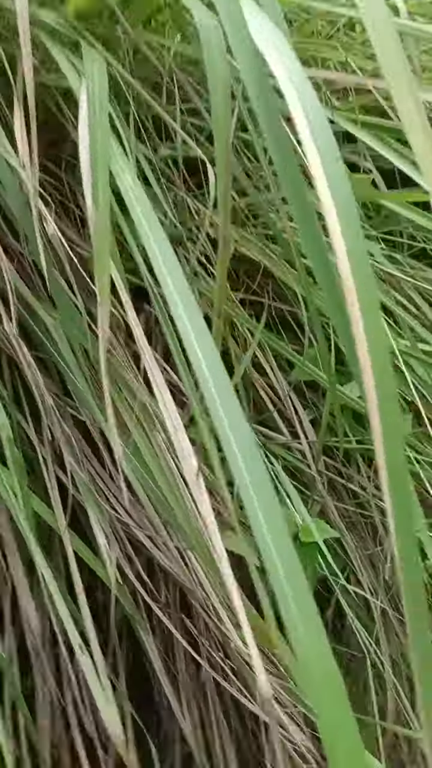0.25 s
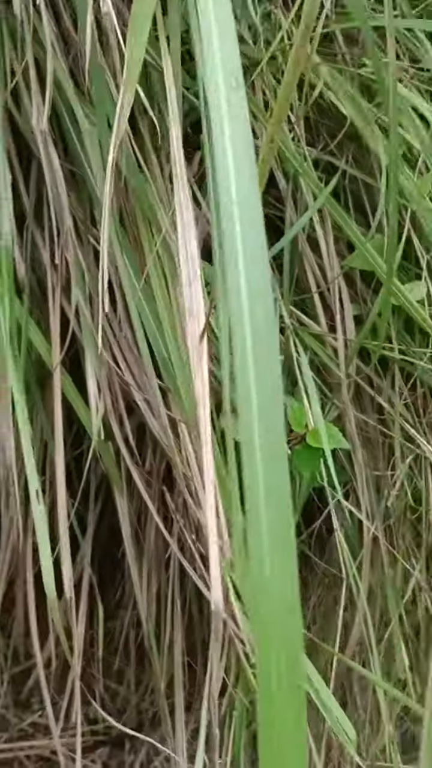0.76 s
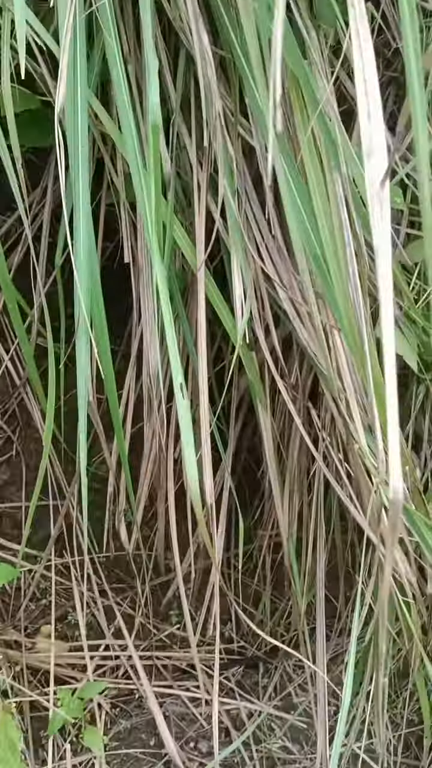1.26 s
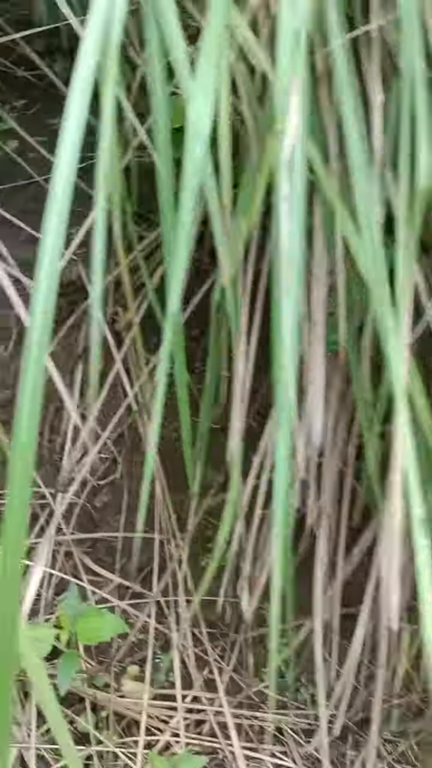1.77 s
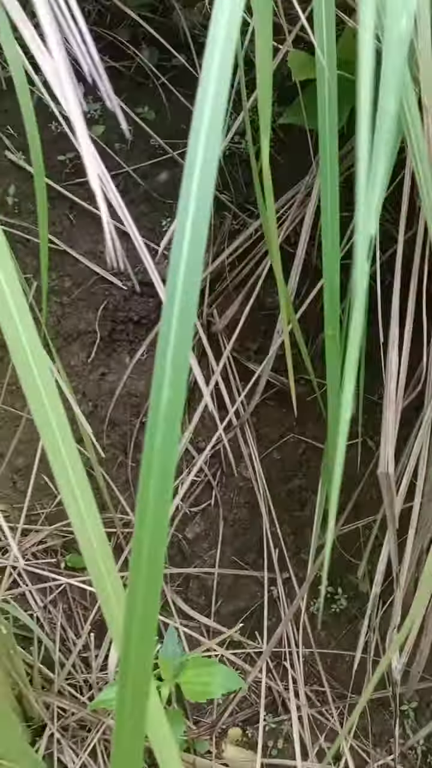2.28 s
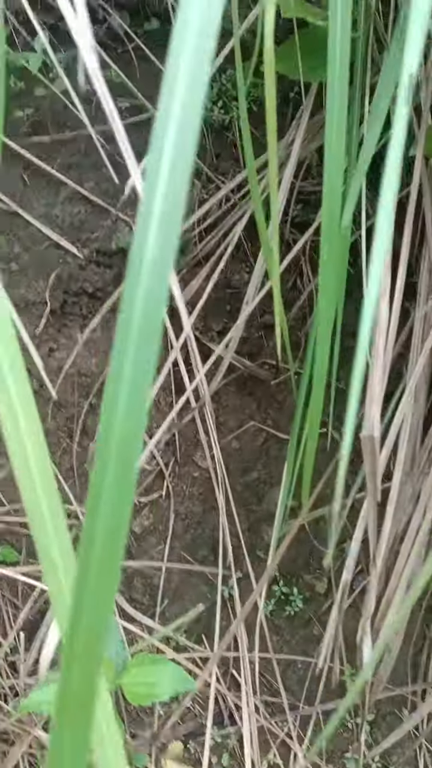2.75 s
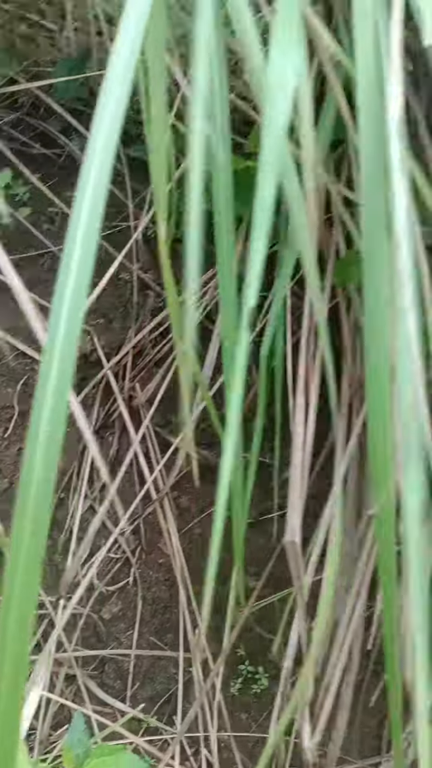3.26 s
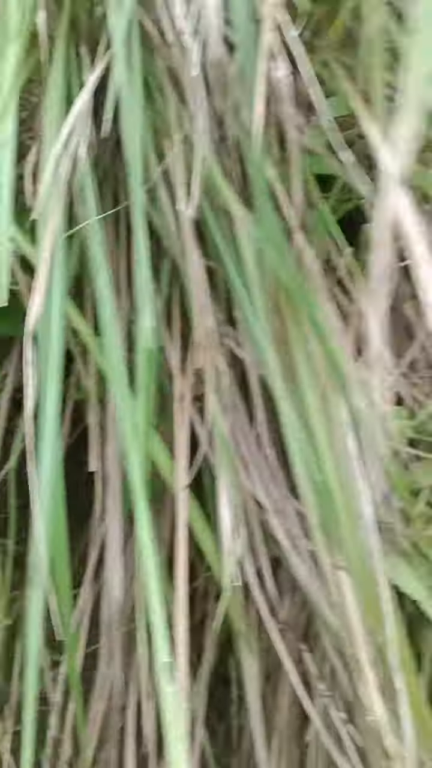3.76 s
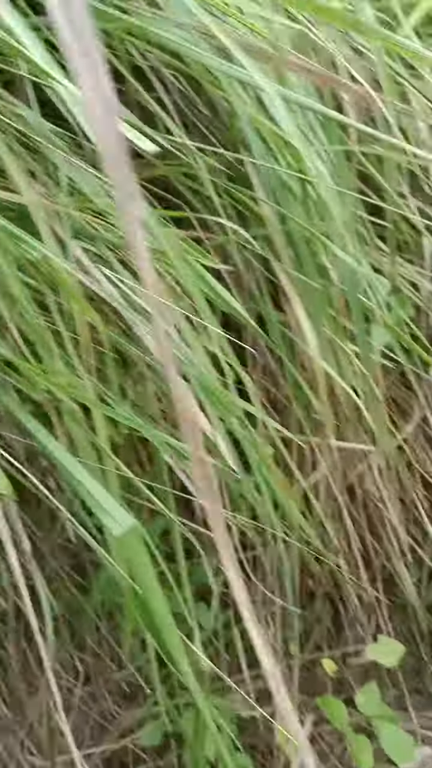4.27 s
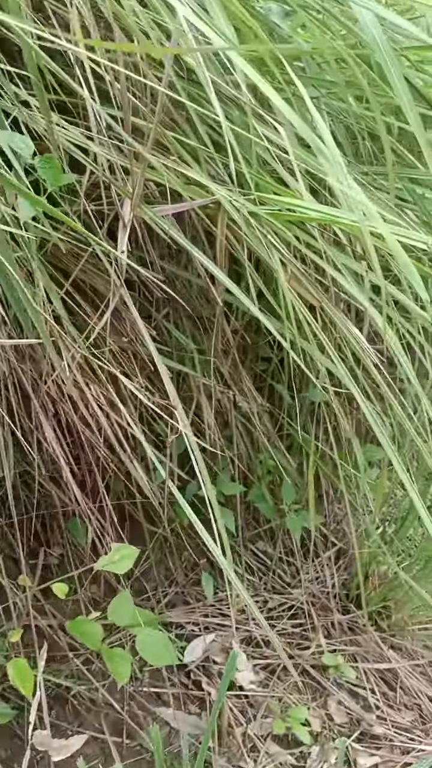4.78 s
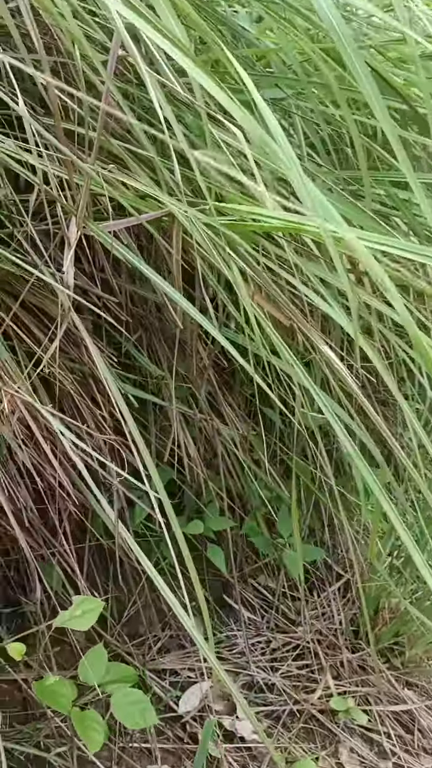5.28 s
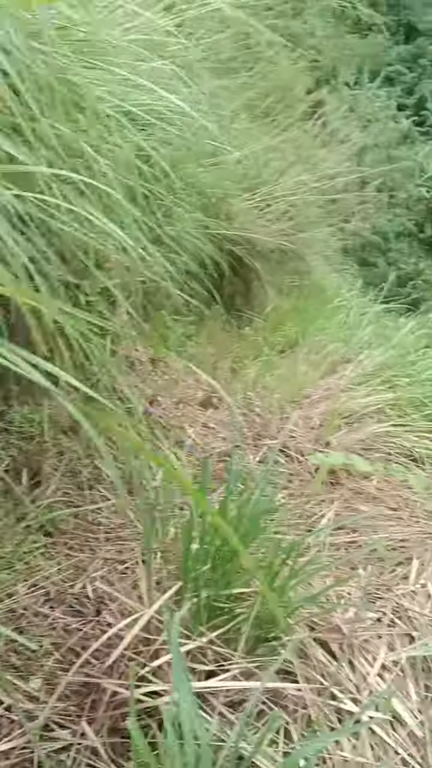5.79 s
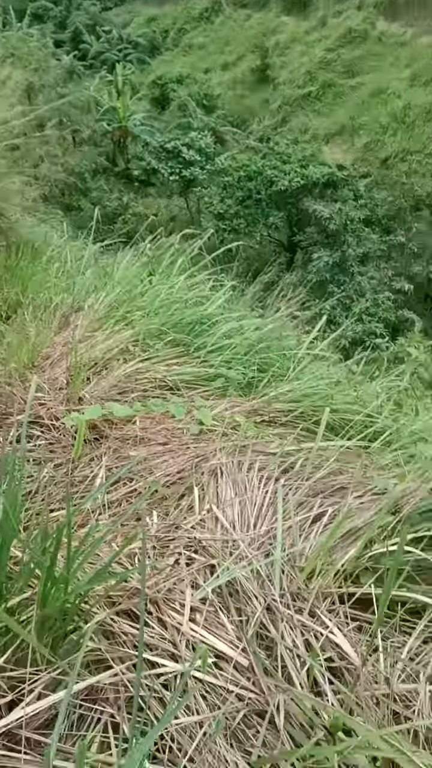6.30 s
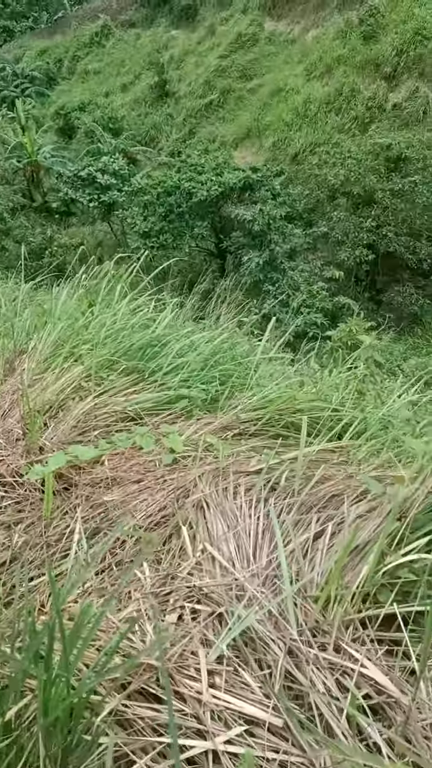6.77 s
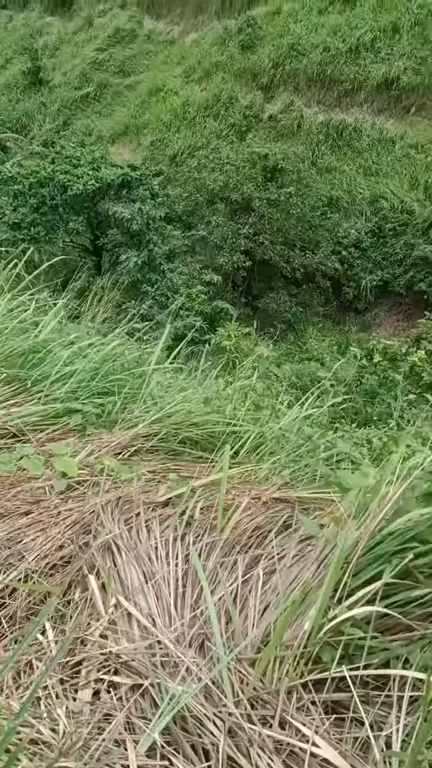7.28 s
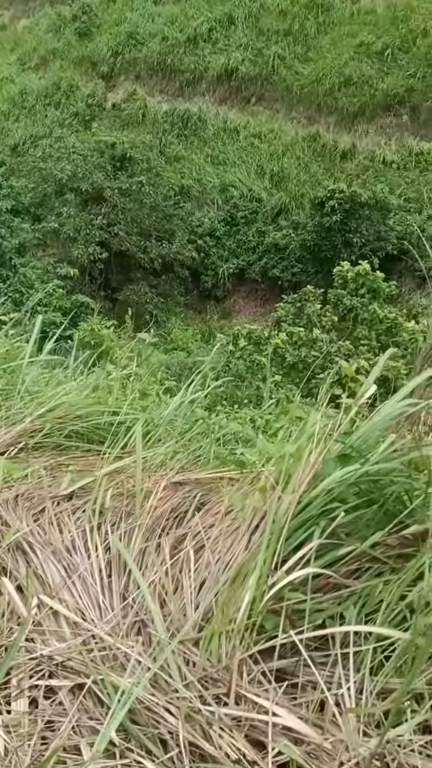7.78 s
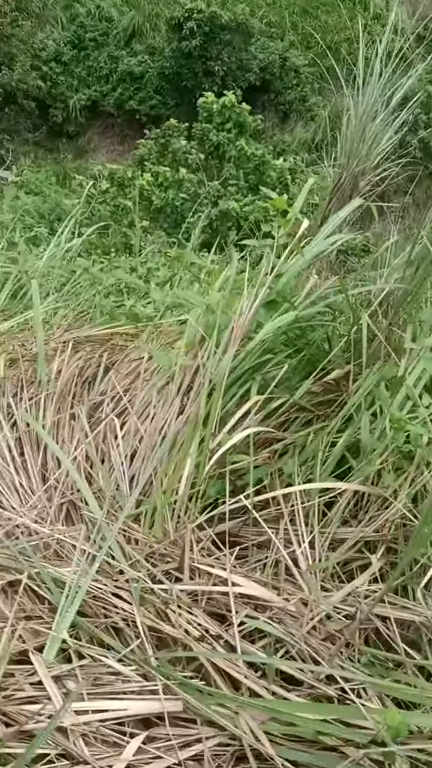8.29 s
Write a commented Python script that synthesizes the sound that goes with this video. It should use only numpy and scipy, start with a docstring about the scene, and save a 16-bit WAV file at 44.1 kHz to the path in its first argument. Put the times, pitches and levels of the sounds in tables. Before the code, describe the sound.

Close, bright rustling of tall half-dry grass brushing past the microphone, with dry snaps, a lull, then lighter swishes and soft handling bumps.

```python
"""Pushing through half-dry grass

Someone on a hillside path pushes through tall grass, holding a small camera; its two ports hear it unequally.
Drag and swishes are dense random slips plus ticks and leaf crackle, coloured by band and driven by a push level.
Rubs are slips in a low band; snaps are noise shaped by ragged tearing, with ring and stem peaks.
Hand bumps are short damped swings with judder and dull knocks; open air is faint low-frequency noise."""
import sys
import numpy as np
from scipy import signal
from scipy.fft import rfft, irfft
from scipy.io import wavfile
from scipy.ndimage import uniform_filter1d

SR = 44100
rng = np.random.default_rng(int(sys.argv[2]) if len(sys.argv) > 2 else 0)


def materialize(psi):
    """Save the field psi as 16-bit PCM at rate SR to the path in sys.argv[1].

    A 1-D psi becomes a single channel; in a 2-D psi each row is a channel.
    """
    bounded = np.clip(np.atleast_2d(psi).T, -1, 1)
    quanta = np.round(bounded * 32767).astype(np.int16)
    wavfile.write(sys.argv[1], SR, quanta)


N = 376613

# Colour of the grass at the two ports. Each row: frequency in Hz, left level in dB, right level in dB.
PORT_COLOUR = [(200, -8, -6.5), (790, -14, -16), (1180, -8, -12.5), (1650, -8, -10), (2230, 0, -3.5),
               (2660, -1.5, -4), (3050, -2, 0.3), (3620, -2, -2.6), (4020, 2.5, -0.5), (4850, 0.5, 0),
               (5770, 4.5, 0.8), (8220, 0.1, 1), (8560, 3.5, 4.3), (9960, 1.8, -2), (10670, 6, 0),
               (11900, 4.5, 4), (12940, 9, -4), (14300, 6.5, 2.5), (15500, 0, 2)]
# Steady drag as the walker slows and moves on. Each row: time in seconds, sliding level in dB before trim.
DRAG_LEVEL = [(0.0, -23.5), (0.63, -38), (1.1, -28.5), (1.56, -43), (2.02, -34), (2.71, -42), (2.81, -47),
              (3.16, -54), (3.47, -51), (4.19, -42.5), (4.24, -35), (4.83, -39.5), (5.3, -31.5),
              (5.62, -40), (5.95, -37.5), (6.48, -51), (7.48, -51), (8.54, -42)]
# Side balance of the grass. Each row: time in seconds, left minus right in dB (the rustle re-centres it).
GRASS_SIDE = [(0, 2), (.4, 7.5), (.85, -0.5), (1.5, 0), (2.35, 3), (3.2, 1), (4, 4.5), (5.4, 6), (7.1, 7),
              (8.54, 5)]
# Blades sweeping across the camera. Each row: start in seconds, contact in seconds, level in dB before trim,
# share of stiff stalks in dB, share of thin leaf edges in dB.
BLADE_SWISHES = [(-0.003, 0.071, -28.5, -8, 7), (0.38, 0.057, -37, 7, -4), (0.527, 0.044, -29, -4.5, -9),
                 (0.675, 0.31, -29.5, -2, 2), (0.964, 0.025, -27, 2, -2), (1.23, 0.031, -35, 4, 6),
                 (1.47, 0.1, -30, -1, 1.5), (1.588, 0.066, -38, 1, 6), (1.949, 0.12, -36, -0.5, 0),
                 (2.922, 0.17, -55.5, 6, 2), (3.229, 0.015, -42.5, -3.5, 1), (3.6, 0.084, -50, -1, 0.5),
                 (3.787, 0.049, -47, -3, 2.5), (3.921, 0.044, -41.5, -1.5, -2),
                 (4.447, 0.059, -33, -1.5, -2), (4.511, 0.049, -44, -27, 13), (4.79, 0.11, -45.5, -4, 8),
                 (5.208, 0.038, -36.5, 3, 12), (5.63, 0.22, -46, -2, 16), (6.049, 0.083, -44.5, 5, 24),
                 (6.194, 0.031, -37, -1, -2), (6.26, 0.023, -38.0, 0.5, 2), (6.543, 0.2, -43.5, -2, 6.5),
                 (6.701, 0.076, -39, -1, 7), (6.782, 0.081, -36.5, 3.5, 14),
                 (6.931, 0.061, -41.5, 0.5, 4.5), (7.072, 0.11, -44.5, -0.5, -3),
                 (7.199, 0.11, -42, -0.5, 2.5), (7.357, 0.03, -51, -5, -6), (7.528, 0.1, -41.5, -2.5, -0.5),
                 (7.624, 0.19, -39, -4, 7), (7.8, 0.17, -38, -0.5, 4), (8.077, 0.75, -45, 2.5, 5.5),
                 (8.263, 0.053, -42, 0, 18), (8.467, 0.05, -40, 1, 2)]
# The rustle moves from blades at the case down to the feet. Each row: time in seconds, left lead in ms
# (negative: right leads), likeness of the ports from 0 to 1.
RUSTLE_ARRIVAL = [(0, -0.048, 0.08), (4.1, -0.06, 0.21), (4.5, 0.48, 0.23), (5.6, 0.43, 0),
                  (6.1, 0.46, 0.81), (7.4, 0.45, 0.9), (8.54, 0.447, 0.44)]
# Colour of the late rustle, where both ports hear alike. Each row: frequency in Hz, extra dB at full likeness.
LATE_COLOUR = [(600, 2.5), (1100, 4.5), (2200, -2), (3300, 2.5), (4200, 0.5), (5200, -1.7), (6800, 2.5),
               (7900, -0.5), (9000, 0.5)]
# A blade or the grip slides along the case. Each row: start in seconds, length in seconds,
# level in dB before trim, left minus right in dB.
CASE_RUBS = [(-0.1, 0.84, -66, 5), (0.55, 0.49, -62, -1), (1.24, 0.38, -63, -3), (2.377, 0.37, -58, -4),
             (2.68, 0.33, -63, -6), (2.98, 0.26, -63.5, -7), (4.11, 0.4, -57.5, -1),
             (4.788, 0.22, -59.5, -2), (6.82, 0.26, -63, 1)]
# Open air. Each row: frequency in Hz, relative density in dB per Hz.
AIR_COLOUR = [(15, 1), (30, 4), (70, 2), (110, -0.5), (200, -4), (450, -7.5), (800, -16), (3000, -28)]
# Stalks that snap or flick the case. Each row: time in seconds, level in dB before trim, ring in Hz,
# extra low knock in dB, extra hollow stem in dB, tearing time in seconds.
STALK_SNAPS = [(0.242, -10.5, 13700, -1, -9, 0.0016), (0.537, -19, 5800, -16, 4, 0.0023),
               (0.89, -16, 15000, 17, 3, 0.0013), (0.8941, -16.5, 613, 16, -0.5, 0.0028),
               (0.9007, -29, 2610, 3, 2, 0.002), (1.265, -12, 11500, -4, -13, 0.0036),
               (1.282, -11.5, 11500, -9, -22, 0.0009), (1.3755, -20, 11700, -4, 0, 0.0027),
               (1.4274, -15.5, 6000, -7, -2, 0.0012), (1.485, -16, 8850, 11, 6, 0.00096),
               (1.4892, -12, 8750, 2, 1, 0.0015), (1.4932, -12, 13500, -3, 10, 0.002),
               (1.4941, -10, 6000, 6, -3, 0.0021), (1.497, -18, 6060, 13, 6, 0.0048),
               (1.544, -12.5, 8900, 0, -5, 0.003), (1.5572, -15.5, 8400, 18, 1, 0.0014),
               (1.566, -23, 13000, 0, -7, 0.002), (1.5892, -25, 13000, 1, -5, 0.001),
               (1.81, -20.5, 6400, -26, -20, 0.0031), (2.4172, -17, 13800, -6, -6, 0.0026),
               (2.44, -16.5, 12800, -4, -16, 0.0035), (2.9008, -33, 9200, -7, -9, 0.002),
               (3.0275, -30, 12000, -6, -14, 0.0007), (3.3025, -28.5, 5360, -1, 9, 0.0055),
               (3.405, -25, 9700, -5, 8, 0.0074), (3.4214, -31.5, 2760, 2, 7, 0.0087),
               (3.538, -33.5, 2310, -3, 13, 0.0081), (3.625, -27, 2300, -4, 5, 0.012),
               (3.642, -33, 9000, -3, 15, 0.0033), (3.647, -26, 9000, -4, 3, 0.0061),
               (3.9612, -24.5, 13000, 8, 12, 0.004), (4.473, -22, 14000, -10, -7, 0.002),
               (4.5407, -14.5, 12800, -11, -10, 0.006), (4.7057, -12.5, 14200, -8, -10, 0.00069),
               (4.7154, -15.5, 3520, 7, 13, 0.004), (4.8339, -27, 12500, -4, -6, 0.003),
               (5.3913, -15, 13200, -24, -14, 0.0045), (5.95, -14.5, 13300, -4, -7, 0.0068),
               (6.147, -20, 13200, -8, -8, 0.0015), (6.227, -22, 6650, -5, 0, 0.011),
               (6.2491, -19, 13700, 2, 0, 0.0025), (7.096, -25, 10400, 12, -4, 0.0015),
               (7.1055, -23, 13200, -12, -8, 0.001), (7.123, -21, 2180, 8, 0, 0.016),
               (7.387, -26, 14500, 4, -2, 0.012), (7.4345, -28.5, 8900, -18, 5, 0.0046),
               (7.515, -27, 14000, -1, 5, 0.0055), (7.6188, -16.5, 12900, -41, -11, 0.0013),
               (8.0951, -14.5, 13200, 10.5, -4, 0.00086)]
# Soft bumps of the hand on the case. Each row: start in seconds, level in dB before trim, swing in Hz,
# share of hard knock in dB before trim, left minus right in dB, sliding time in seconds.
HAND_BUMPS = [(0.299, -47.5, 61.6, -23, 15, 0.029), (1.556, -44.5, 143, 1.5, -22, 0.0046),
              (2.337, -49, 106, -2, 4, 0.006), (4.167, -32.5, 132, -26, 38, 0.0064),
              (4.324, -42.5, 70.0, 3.5, 18, 0.01), (5.431, -37.5, 96, -29, 20, 0.0098),
              (5.453, -45.5, 80.7, -20, 20, 0.027), (5.501, -43, 142, -38, 18, 0.028),
              (5.662, -45.5, 158, -34, 23, 0.021), (7.887, -46.5, 72.4, -4, 35, 0.012),
              (8.221, -49.5, 102, -8, 11, 0.0092)]

TIME_S = np.arange(N) / SR
BIN_HZ = np.fft.rfftfreq(1024, 1 / SR)
SWISH_ATTACK_S, SWISH_FADE_DB_PER_S = 0.034, 199
DRAG_EDGE_DB, USUAL_EDGE_DB = 0.8, 3  # share of thin leaf edges in the drag, and in PORT_COLOUR
DRAG_STALK_DB, STALK_DB_PER_DB = -0.96, -0.05  # stiff stalks stand out where the push is slow
UNEVEN_DB, UNEVEN_HZ, EDGE_DRIFT_DB = 0.8, 32, 0.5  # grip jumps; rate and depth of edge drift
CATCHES_PER_S, CATCH_S = 77, 0.011  # blades catch at once and slide free slowly
AIR_DB = -65
SETTLE_DB = -23  # fibres settling, against the snap
FIBRE_DECAY_S, FIBRE_SPREAD_DB, FIBRE_FADE_DB = 0.00024, 2, -10  # fade is over the whole tear
SMALL_DB, SMALL_FOLLOW_DB_PER_DB, SMALL_TEAR_S = -25, 0.71, 0.0051  # lesser snaps, before trim
SMALL_SPREAD_DB, SMALL_STEM_DB, SMALL_VARIETY_DB = -5, -9, 0.5
EDGE_HZ = 15850


def gain_of(db):
    """Decibels to an amplitude factor."""
    return 10 ** (np.asarray(db) / 20)


def evened(x):
    """Scales each channel to rms 1."""
    return x / np.sqrt(np.mean(x ** 2, -1, keepdims=True) + 1e-20)


def read(points, hz):
    """Reads every column of a spectrum on a log-frequency axis."""
    point_hz, *columns = np.transpose(points)
    return np.array([np.interp(np.log(hz + 1), np.log(point_hz + 1), c) for c in columns])


def follow(curve, s):
    """Reads a control curve at times s."""
    return np.interp(s, *np.transpose(curve))


def ramp(hz, start_hz, end_hz):
    """Goes from 0 at start_hz to 1 at end_hz on a log-frequency axis."""
    return np.clip(np.log((hz + 1) / start_hz) / np.log(end_hz / start_hz), 0, 1)


def sides(pan_db):
    """Left and right gains of constant power."""
    pair = gain_of(np.array([pan_db, -pan_db]) / 2)
    return pair / np.sqrt(np.mean(pair ** 2, 0))


def add(mix, s, sound):
    """Adds a stereo sound to the mix at time s."""
    part = mix[:, max(round(s * SR), 0):][:, :sound.shape[1]]
    part += sound[:, :part.shape[1]]


def wander(rate_hz, channels=2):
    """Random drift of rms 1 with little change faster than rate_hz."""
    hz = np.fft.rfftfreq(N, 1 / SR)
    noise = rng.standard_normal((channels, N))
    return evened(irfft(rfft(noise) / (1 + (hz / rate_hz) ** 4), N))


def slips(per_s, spread_db, flutter_db, flutter_hz):
    """Tiny teeth on the blade edges catch and let go; each port hears the blades nearest to it."""
    size = gain_of(spread_db * np.minimum(rng.exponential(1, (2, N)), 4))
    clicks = size * rng.standard_normal((2, N)) * (rng.random((2, N)) < per_s / SR)
    return evened(clicks * gain_of(flutter_db * wander(flutter_hz)))


def ticks(per_s, spread_db, tick_s, apart_db):
    """Dry blade edges flick off one another: bare ticks without pitch, heard unequally at the ports."""
    chance, size, pan = rng.random(N), rng.exponential(1, N), rng.standard_normal(N)
    sizes = gain_of(spread_db * np.minimum(size, 3))
    hits = (chance < per_s / SR) * sizes * sides(apart_db * pan)
    envelope = signal.lfilter([1], [1, -np.exp(-1 / (tick_s * SR))], hits)
    return evened(envelope * rng.standard_normal((2, N)))


def crackle(per_s, spread_db, ring_s, ring_share, apart_db, count=24):
    """Dry leaves buckle in short bursts, each at one of count pitches, heard unequally at the ports."""
    t, out = np.arange(512) / SR, np.zeros((2, N))
    for hz in np.geomspace(2300, 15000, count):
        chance, size, pan = rng.random(N), rng.exponential(1, N), rng.standard_normal(N)
        at = np.flatnonzero(chance < per_s / count / SR)
        clicks = np.zeros((2, N))
        clicks[:, at] = gain_of(spread_db * np.minimum(size[at], 4)) * sides(apart_db * pan[at])
        ring = np.sin(2 * np.pi * (hz * t + rng.random((2, 1))))
        leaf = (rng.standard_normal((2, len(t))) + ring_share * ring) * np.exp(-t / ring_s)
        out += signal.oaconvolve(clicks, leaf, axes=1)[:, :N]
    return evened(out)


def catches():
    """The grip jumps whenever a blade catches, then relaxes; rms 1."""
    jumps = (rng.random(N) < CATCHES_PER_S / SR) * rng.uniform(.5, 1, N)
    grip = signal.lfilter([1], [1, -np.exp(-1 / (CATCH_S * SR))], jumps)
    return evened(grip - grip.mean())


def pushing():
    """Swishes rise, hold and fade over the drag: level and shares of stalks and leaf edges, in dB."""
    power = gain_of(follow(DRAG_LEVEL, TIME_S)) ** 2
    stalks, edges = power * DRAG_STALK_DB, power * DRAG_EDGE_DB
    for s, contact_s, db, stalk_db, edge_db in BLADE_SWISHES:
        rise = np.clip((TIME_S - s) / SWISH_ATTACK_S, 0, 1)
        fade_db = SWISH_FADE_DB_PER_S * np.clip(TIME_S - s - contact_s, 0, 1)
        swish = (rise * gain_of(db - fade_db)) ** 2
        power = power + swish
        stalks = stalks + swish * stalk_db
        edges = edges + swish * edge_db
    grip, drift = catches(), wander(UNEVEN_HZ, channels=1)[0]
    push_db = 10 * np.log10(power) + UNEVEN_DB * grip
    stalks_db = stalks / power + STALK_DB_PER_DB * (push_db - push_db.mean())
    edges_db = edges / power - USUAL_EDGE_DB + EDGE_DRIFT_DB * drift
    return push_db, stalks_db, edges_db


def rustle(level_db, crackle_db, loosen_db_per_db, patchy_db, stalk_db, edge_db, bass_db, centre_db,
           tick_db, tick_loosen_db_per_db, shared, scatter):
    """Slips, ticks and crackle follow the push; stalks thicken the sound, leaf edges sharpen it."""
    push_db, stalks_db, edges_db = pushing()
    excess_db = push_db - push_db.mean()
    # a slow push leaves single crackles standing out, a fast one merges them into hiss
    loose = gain_of(crackle_db - loosen_db_per_db * excess_db)
    sliding = slips(per_s=30000, spread_db=1, flutter_db=0.76, flutter_hz=48.0)
    buckling = crackle(per_s=330, spread_db=3.0, ring_s=0.0063, ring_share=0.64, apart_db=6.5)
    flicking = ticks(per_s=420, spread_db=1.0, tick_s=0.00025, apart_db=4.5)
    flicking = gain_of(tick_db - tick_loosen_db_per_db * np.maximum(excess_db, 0)) * flicking
    drive = (sliding + flicking + loose * buckling) / np.sqrt(1 + loose ** 2)
    hz, t, z = signal.stft(drive, SR, nperseg=512, noverlap=384)

    # long waves and grass further off reach both ports alike, one a moment before the other
    when, lead_ms, likeness = np.transpose(RUSTLE_ARRIVAL)
    like = np.interp(t, when, likeness)
    far = like * (1 - scatter * ramp(hz, 2500, 9100))[:, None]
    same = np.clip(np.maximum(far, shared * ramp(hz, 1300, 400)[:, None]), 0, 1)
    delay = np.exp(-2j * np.pi * hz[:, None] * np.interp(t, when, lead_ms) / 1000)
    z = np.array([z[0], same * delay * z[0] + np.sqrt(1 - same ** 2) * z[1]])

    edge_band = ramp(hz, 3950, 15400)
    stalky = np.interp(t, TIME_S, stalks_db) * ramp(hz, 4800, 4100)[:, None]
    edgy = np.interp(t, TIME_S, edges_db) * edge_band[:, None]
    # narrow blades radiate almost no bass
    shade = bass_db * ramp(hz, 364, 223) + stalk_db * ramp(hz, 1600, 1580) + edge_db * edge_band
    # random patches of level drift in time and frequency, separately at each port
    patches = uniform_filter1d(rng.standard_normal(z.shape), size=14, axis=2)
    patches = uniform_filter1d(patches, size=6, axis=1)
    late = like * read(LATE_COLOUR, hz).T
    colour = (read(PORT_COLOUR, hz) + shade)[:, :, None] + stalky + edgy + late
    colour = colour + patchy_db * patches / patches.std()
    # the case shadows the treble more than the bass
    turn_db = (follow(GRASS_SIDE, t) - centre_db) * ramp(hz, 1300, 9700)[:, None]
    z = z * gain_of(colour) * sides(turn_db)
    swish = signal.istft(z, SR, nperseg=512, noverlap=384)[1][:, :N]
    return swish * gain_of(push_db + level_db)


def rubs(level_db, low_hz, high_hz, swell, apart):
    """Slips travel through the case, which passes only a low band; each rub swells and dies away."""
    out = np.zeros((2, N))
    case = signal.butter(5, [low_hz, high_hz], "band", fs=SR, output="sos")
    friction = slips(per_s=3000, spread_db=0.5, flutter_db=1.8, flutter_hz=26)
    hum, own = evened(signal.sosfilt(case, friction))
    hum = evened(np.array([hum + apart * own, hum - apart * own]))
    for s, length_s, db, pan_db in CASE_RUBS:
        u = np.clip((TIME_S - s) / length_s, 0, 1)
        envelope = (4 * u * (1 - u)) ** swell
        out += gain_of(db + level_db) * sides(pan_db)[:, None] * envelope * hum
    return out


def air(left_db):
    """A faint rumble of moving air: shaped noise, separate at each port."""
    hz = np.fft.rfftfreq(N, 1 / SR)
    spectrum = rfft(rng.standard_normal((2, N))) * gain_of(read(AIR_COLOUR, hz))
    return evened(irfft(spectrum, N)) * gain_of(AIR_DB) * sides(left_db)[:, None]


def causal(x, db):
    """Colours x by a 513-bin dB spectrum in minimum phase: nothing ahead of the attack."""
    cepstrum = irfft(np.log(gain_of(db)))
    fold = 1 + np.sign(np.fft.fftfreq(cepstrum.shape[-1]))
    taps = irfft(np.exp(rfft(cepstrum * fold)))
    return signal.oaconvolve(x, taps, axes=-1)[:, :x.shape[1]]


def port_noise(size, alike_hz=700, apart_hz=2200):
    """Noise whose long waves are the same at both ports."""
    z = rfft(rng.standard_normal((2, size)))
    same = ramp(np.fft.rfftfreq(size, 1 / SR), apart_hz, alike_hz)
    return irfft(np.array([z[0], same * z[0] + np.sqrt(1 - same ** 2) * z[1]]))


def tearing(t, tear_s, count=6):
    """Envelope of a stalk's fibres giving way one after another, tending to weaken."""
    order = np.arange(count)
    place = (order + rng.random(count) * (order > 0)) / count
    size = gain_of(FIBRE_FADE_DB * place + FIBRE_SPREAD_DB * rng.standard_normal(count))
    u = np.maximum(t - tear_s * place[:, None], 0) / FIBRE_DECAY_S
    return np.sqrt(size ** 2 @ (u * np.exp(2 - 2 * u)) / np.sum(size ** 2))


def small_snaps(count=20):
    """Lesser stalks give way at random, louder where the grass drags harder; rows as in STALK_SNAPS."""
    when, pitch = rng.random((count, 2)).T
    size, knock, stem = rng.standard_normal((count, 3)).T
    s = when * N / SR
    drag_db = follow(DRAG_LEVEL, s) - follow(DRAG_LEVEL, TIME_S).mean()
    db = SMALL_DB + SMALL_FOLLOW_DB_PER_DB * drag_db + SMALL_SPREAD_DB * size
    ring_hz = 4000 + 10000 * pitch
    knock_db = SMALL_VARIETY_DB * knock
    stem_db = SMALL_STEM_DB + SMALL_VARIETY_DB * stem
    return list(zip(s, db, ring_hz, knock_db, stem_db, np.full(count, SMALL_TEAR_S)))


def snaps(level_db, tail_s, tail_db, ring_db, ring_octaves, stem_hz, bass_db,
          hollow_ring_db_per_db, hollow_dull_db_per_db):
    """A stalk tears in a ragged run of tiny cracks, its hollow stem rings, then the fibres settle."""
    t, out = np.arange(2048) / SR, np.zeros((2, N))
    stem = np.exp(-(np.log2((BIN_HZ + 1) / stem_hz) / .5) ** 2)
    for s, db, hz, knock_db, stem_db, tear_s in [*STALK_SNAPS, *small_snaps()]:
        fade = tearing(t, tear_s) + gain_of(tail_db) * np.exp(-t / tail_s)
        hollow_db = max(stem_db, 0)  # a hollow stem rings more and cracks less brightly
        peak = np.exp(-(np.log2((BIN_HZ + 1) / hz) / ring_octaves) ** 2)
        ring = (ring_db + hollow_ring_db_per_db * hollow_db) * peak
        body = knock_db * ramp(BIN_HZ, 3200, 1000) + bass_db * ramp(BIN_HZ, 460, 150)
        dull = hollow_dull_db_per_db * hollow_db * ramp(BIN_HZ, 7800, 9000)
        colour = read(PORT_COLOUR, BIN_HZ) + ring + body + stem_db * stem - dull
        crack = causal(port_noise(size=len(t)) * fade, colour)
        crack /= np.linalg.norm(crack, axis=1, keepdims=True)  # unit energy at each port
        pair = sides(follow(GRASS_SIDE, s))[:, None]
        add(out, s + 0.00032, gain_of(db + level_db) * pair * crack)  # 0.32 ms after the row's time
    return out


def bumps(level_db, cycles, knock_db, knock_hz, knock_s, rub_db, rub_s, dull_hz, slide_db, slide_hz):
    """The nudged case swings briefly and judders as the grip slides; a hard touch adds dull knock and rub."""
    t, out = np.arange(SR // 4) / SR, np.zeros((2, N))
    padding = signal.butter(4, dull_hz, fs=SR, output="sos")
    grip = signal.butter(2, [slide_hz / 1.4, slide_hz * 1.4], "band", fs=SR, output="sos")
    for s, db, hz, hard_db, pan_db, slide_s in HAND_BUMPS:
        u, skin = t * hz / cycles, rng.standard_normal(len(t))
        swing = u * np.exp(1 - u) * np.cos(2 * np.pi * hz * t)
        slide = t / slide_s * np.exp(1 - t / slide_s)
        judder = gain_of(slide_db) * evened(signal.sosfilt(grip, skin)) * slide
        rub = gain_of(rub_db) * evened(signal.sosfilt(padding, skin)) * np.exp(-t / rub_s)
        thud = np.exp(-t / knock_s) * np.sin(2 * np.pi * knock_hz * t)
        knock = signal.sosfilt(padding, thud) + rub
        bump = swing + judder + gain_of(knock_db + hard_db) * knock
        add(out, s, gain_of(db + level_db) * sides(pan_db)[:, None] * bump)
    return out


def scene():
    """Sums all layers, with no walls to echo."""
    grass = rustle(level_db=-1, crackle_db=-12.5, loosen_db_per_db=1.0, patchy_db=2.5, stalk_db=0.0,
                   edge_db=1, bass_db=-39, centre_db=4.0, tick_db=-8.5, tick_loosen_db_per_db=0.45,
                   shared=0.46, scatter=1.0)
    sliding = rubs(level_db=-1, low_hz=348, high_hz=570, swell=0.84, apart=0.38)
    rumble = air(left_db=-5)
    stalks = snaps(level_db=10.5, tail_s=0.016, tail_db=SETTLE_DB, ring_db=10, ring_octaves=0.11,
                   stem_hz=2900, bass_db=-13.5, hollow_ring_db_per_db=0.77, hollow_dull_db_per_db=0.5)
    hand = bumps(level_db=-1.0, cycles=0.31, knock_db=13.0, knock_hz=424, knock_s=0.00065, rub_db=-22.5,
                 rub_s=0.02, dull_hz=650, slide_db=-15.5, slide_hz=151)
    return grass + sliding + rumble + stalks + hand


def record(dry):
    """Band limit: linear-phase low-pass at EDGE_HZ."""
    taps = signal.firwin(1023, EDGE_HZ, window=("kaiser", 9), fs=SR)
    return signal.oaconvolve(dry, taps[None], "same", axes=1)


dry = scene()
out = record(dry)
materialize(out)
```